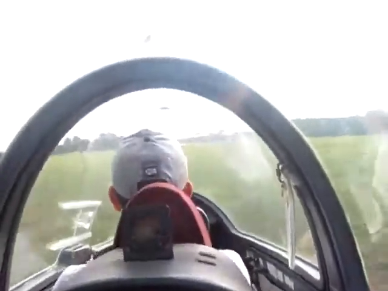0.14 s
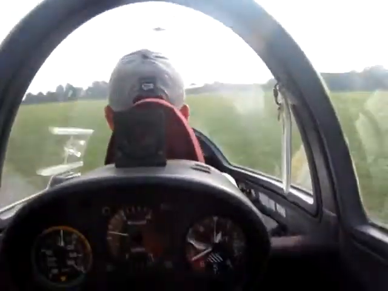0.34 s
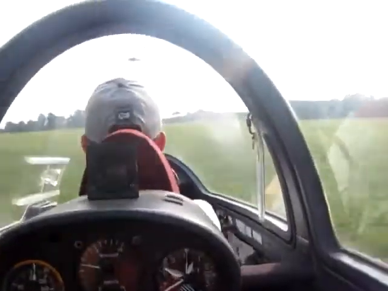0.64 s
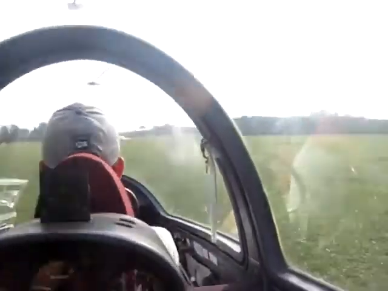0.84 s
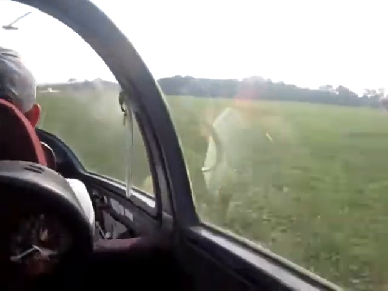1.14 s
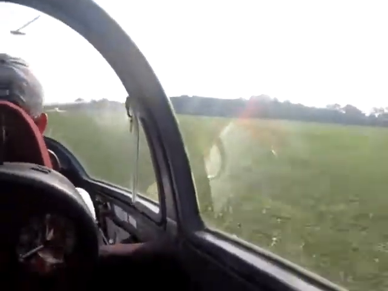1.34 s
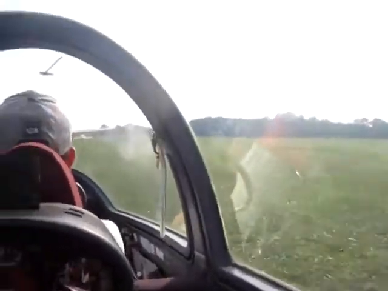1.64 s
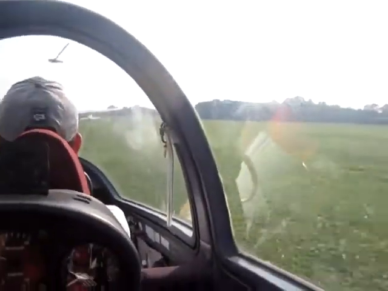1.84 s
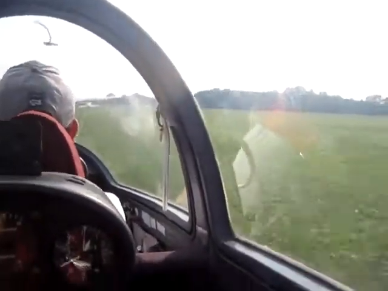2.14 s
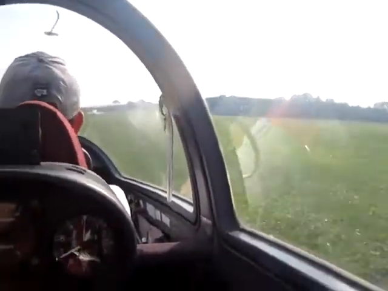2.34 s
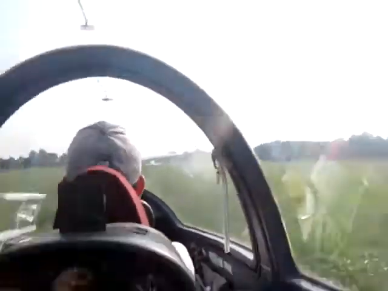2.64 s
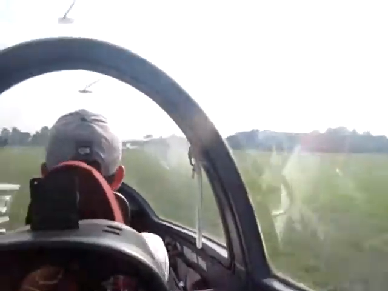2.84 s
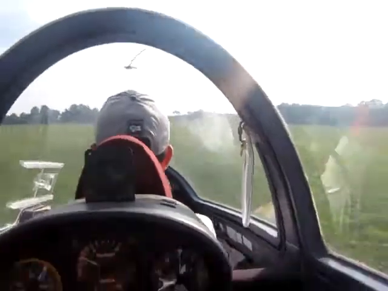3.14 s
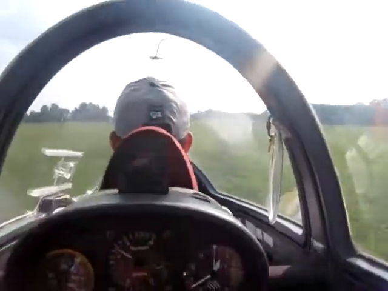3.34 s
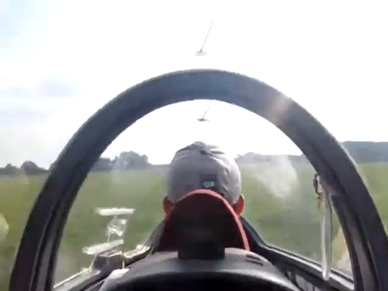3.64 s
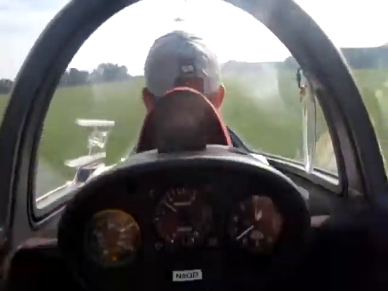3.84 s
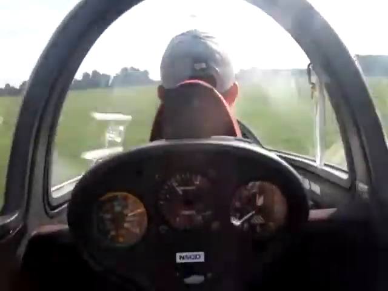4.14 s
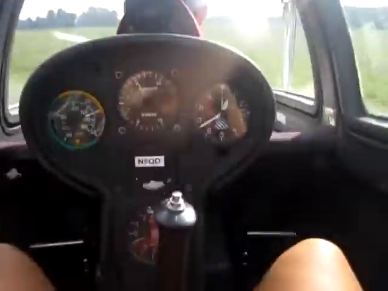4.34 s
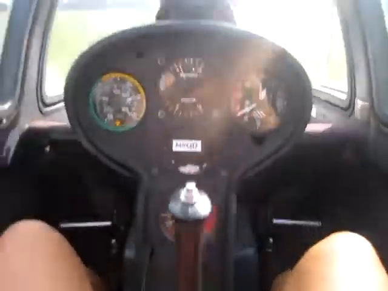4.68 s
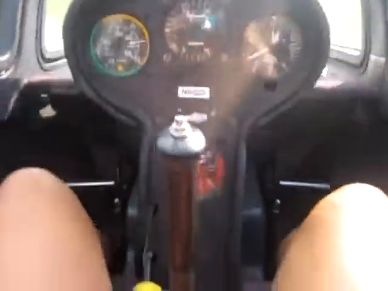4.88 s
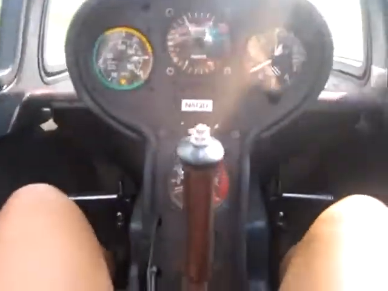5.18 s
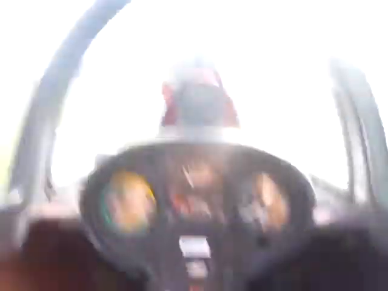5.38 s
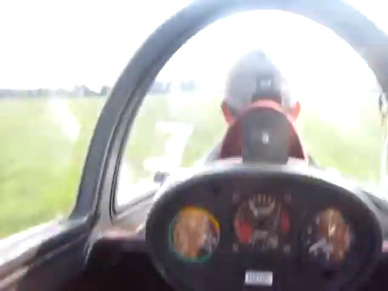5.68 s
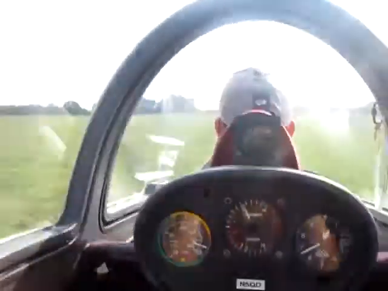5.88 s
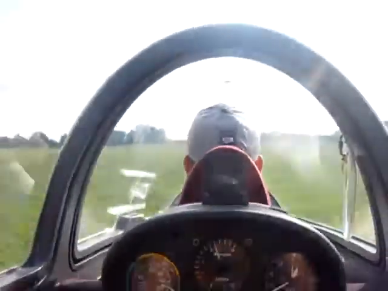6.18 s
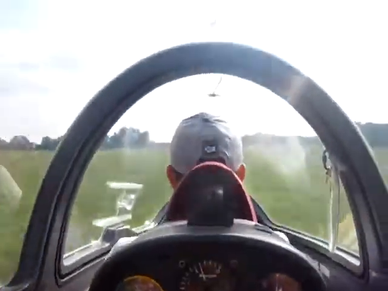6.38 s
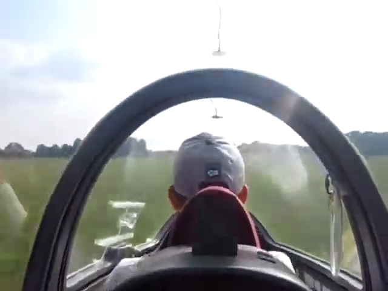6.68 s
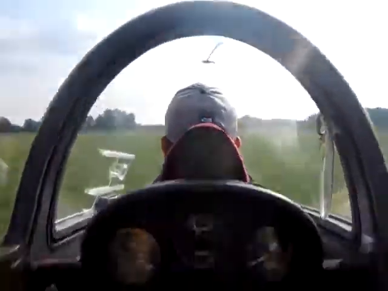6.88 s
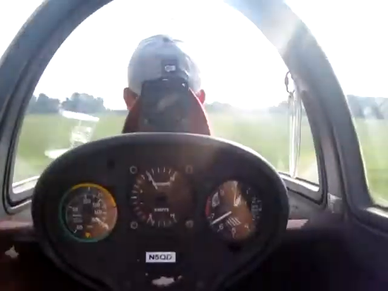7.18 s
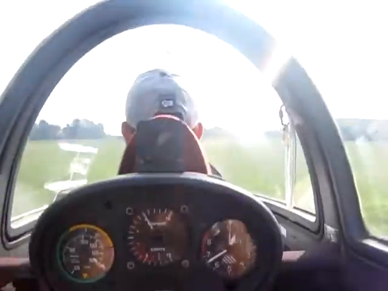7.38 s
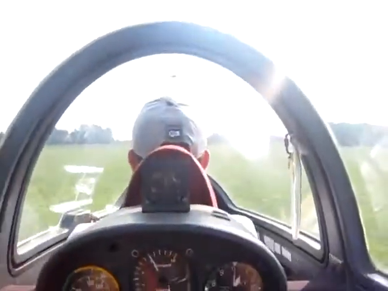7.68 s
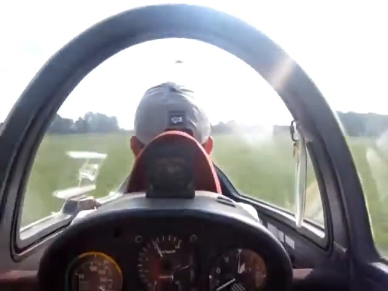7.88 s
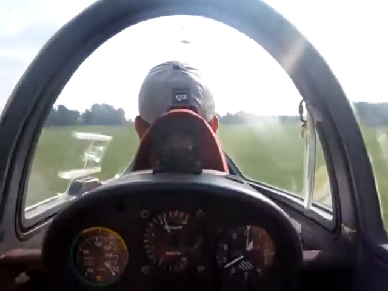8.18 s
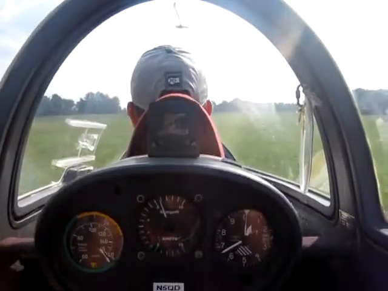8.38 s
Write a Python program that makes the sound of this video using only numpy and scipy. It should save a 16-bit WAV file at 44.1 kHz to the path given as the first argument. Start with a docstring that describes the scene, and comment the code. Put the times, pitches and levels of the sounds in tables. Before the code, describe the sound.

A glider takes off from a rough field, heard close up inside its hollow shell. Deep continuous drumming comes with fine buzzing, hard knocks and short metallic-plastic chatter. After a jarring start it calms a little, with faint squeaky rubs, then more heavy jolts follow. Around seven seconds the rattling thins out and dense, surging wind noise takes over. The small microphone gives a dry, compressed sound with no extreme highs.

```python
"""Inside the cockpit of a glider rolling fast over a bumpy grass field, heard by a small microphone.
The wheel drums the hollow fuselage and works panels and fittings: noise shaped by their resonances.
Jolts set the canopy frame chattering and clacking; blows and slow rubs ring the modes of the shell.
When the wings take the weight, the wheel eases and the airflow swells into a gusty roar of shaped noise.
A limiter holds down the peaks, and the microphone loses one band and the extreme treble."""
import sys
import numpy as np
from scipy import signal
from scipy.fft import rfft, irfft, next_fast_len
from scipy.io import wavfile
from scipy.ndimage import uniform_filter1d, minimum_filter1d, map_coordinates

SR = 44100
rng = np.random.default_rng(int(sys.argv[2]) if len(sys.argv) > 2 else 0)


def to_wav(sig):
    """Store sig (one row per channel, or 1-D mono) as 16-bit WAV at the path in sys.argv[1].

    Samples outside -1..1 are clipped; the rate is SR.
    """
    pcm = np.clip(np.atleast_2d(sig), -1, 1) * 32767
    pcm = np.round(pcm).astype(np.int16)
    wavfile.write(sys.argv[1], SR, pcm.T)  # frames by channels


N = 375732

# Jolts of the canopy frame. Each row: start in seconds, nominal chatter peak in dB, length in seconds.
JOLTS = [(0.0054, -12.5, 0.033), (0.1013, -15.5, 0.016), (0.117, -14.5, 0.03), (0.182, -19.5, 0.037),
         (0.22, -29, 0.041), (0.25, -27.5, 0.078), (0.324, -19, 0.024), (0.4, -18.5, 0.018),
         (0.434, -22, 0.021), (0.483, -20, 0.024), (0.64, -28.5, 0.093), (1.093, -22, 0.015),
         (1.198, -19.5, 0.037), (1.475, -25.5, 0.03), (1.526, -22, 0.012), (1.912, -28, 0.029),
         (2.545, -22, 0.057), (2.753, -27.5, 0.021), (2.882, -26, 0.017), (2.994, -20, 0.024),
         (3.0565, -20, 0.011), (3.564, -24.5, 0.042), (3.836, -28, 0.023), (3.857, -16, 0.018),
         (3.934, -21.5, 0.037), (4.027, -21.5, 0.029), (4.133, -17.5, 0.029), (4.14, -18.5, 0.04),
         (4.234, -19.5, 0.034), (4.337, -15, 0.021), (4.3646, -13, 0.028), (4.431, -21, 0.012),
         (4.452, -14, 0.022), (4.504, -18, 0.011), (4.595, -27.5, 0.047), (4.647, -19.5, 0.029),
         (4.725, -19.5, 0.019), (4.958, -26.5, 0.091), (5.038, -24, 0.024), (5.232, -26.5, 0.033),
         (5.256, -18, 0.03), (5.318, -22.5, 0.018), (5.3423, -12, 0.018), (5.366, -18.5, 0.012),
         (5.42, -15.5, 0.025), (5.464, -24, 0.032), (5.712, -27.5, 0.03), (5.927, -25.5, 0.044),
         (6.02, -28, 0.08), (6.111, -25, 0.091), (6.226, -12.5, 0.023), (6.322, -13, 0.013),
         (6.347, -17, 0.024), (6.621, -20, 0.02), (6.788, -26, 0.018), (7.083, -19.5, 0.022),
         (7.125, -14.5, 0.004), (7.177, -18, 0.017)]
# Resonances of the cockpit panels. Each row: pitch in Hz, width in Hz, relative strength in dB.
PANELS = [(257, 20, 0), (302.7, 24.5, 8), (351, 18, 2), (413, 21, 7), (687, 194, 4.5)]
# Resonances of the canopy frame. Each row: pitch in Hz, width in Hz, relative strength in dB.
FRAME = [(1016, 7.8, 12), (1090, 7.7, 7.5), (1321.5, 8, 14.5), (1660, 120, 3), (2070, 48, 3.5),
         (2660, 62, -6.5), (3250, 45, -1), (4880, 180, 1.5), (5450, 160, 5)]
# The wings take the weight: middle and half length of the change.
LIFT_S, LIFT_SPAN_S = 7.12, 0.09


def roll():
    """Wheel drumming, panel boom and fitting buzz: noise through resonances, shaken by bumps of the turf."""
    # Drum modes of the hollow fuselage. Each row: pitch in Hz, width in Hz, relative strength in dB.
    fuselage = [(62.6, 26, -0.5), (94, 19, 5), (129.4, 10.6, 7.5), (162.3, 33, 9), (191, 11, 7.5)]
    # Broad spectra under the modes. Each row: frequency in Hz, relative level in dB per Hz.
    ground = [(12, -41), (25, -10.5), (60, -6), (150, -3), (220, -8), (400, -17), (1000, -98)]
    boom_spectrum = [(100, -49), (230, -2.5), (450, -11), (800, -21.5), (1400, -25), (2500, -35),
                     (6000, -75)]
    buzz_spectrum = [(300, -19), (800, 11), (1500, -1), (3000, -1.5), (5000, -13), (10000, -10.5),
                     (12000, -20.5), (15500, -32)]
    # How hard the ground works the panels. Each row: time in seconds, boom level in dB at 260-900 Hz.
    roughness = [(0, -27), (.28, -23), (.5, -29), (.75, -30), (1.11, -23), (1.42, -32), (1.85, -28),
                 (2.3, -30), (2.5, -22.5), (2.7, -26.5), (3.3, -27.5), (4.1, -26.5), (4.6, -28), (5.2, -26),
                 (5.72, -26.5), (6.14, -25), (7.1, -25.5), (8.52, -28)]
    drum_steady_db, drum_start_db, drum_rise_s, drum_lift_db = -17, -7, 0.21, -4  # at 40-220 Hz
    buzz_start_db, buzz_db_per_s, buzz_lift_db = -51, 0.51, 3.5  # at 2.5-12 kHz; grows with speed
    buzz_follows = 0.85  # dB of buzz per dB of boom

    t, light = np.arange(N) / SR, lift()
    drum_db = drum_steady_db + drum_start_db * np.exp(-(t / drum_rise_s) ** 2) + drum_lift_db * light
    rough_db = np.interp(t, *np.transpose(roughness))
    buzz_db = buzz_start_db + buzz_db_per_s * t
    buzz_db += (buzz_lift_db + gust_db()) * light
    buzz_db += stir_db() * (1 - light)
    buzz_db += buzz_follows * (rough_db - rough_db.mean())

    # Boom and buzz share these bumps, which weaken as the wheel grows light.
    bumps = (1 - 0.65 * light) * wobble(13)
    ripples = (1 - 0.65 * light) * wobble(35)
    drum = filtered(rng.standard_normal(N), body(ground, fuselage))
    boom = filtered(rng.standard_normal(N), body(boom_spectrum, PANELS))
    boom *= amp(1.1 * bumps + 1.6 * ripples + 1.2 * wobble(24))
    buzz = filtered(contacts(150, 5), body(buzz_spectrum, FRAME))
    buzz *= amp(0.66 * bumps + 1.9 * ripples + 3.0 * wobble(70))
    boom, buzz = patchy(boom, patchy_db=1.5), patchy(buzz, patchy_db=2.0)

    drum, boom, buzz = unit(drum, 40, 220), unit(boom, 260, 900), unit(buzz, 2500, 12000)
    return amp(drum_db) * drum + amp(rough_db) * boom + amp(buzz_db) * buzz


def jolts():
    """Each jolt rings the stiff canopy frame and leaves a dying burst of chatter from touching parts."""
    # Broad spectrum of the chatter. Each row: frequency in Hz, relative level in dB per Hz.
    chatter_spectrum = [(300, -28), (800, -0.5), (1500, 0), (3000, 0), (5000, -5.5), (10000, -6.5),
                        (12000, -16.5), (15500, -33)]
    crest_db = 11  # peaks of dense chatter stand this far above its rms

    t = np.arange(SR // 4) / SR
    hz, width, mode_db = np.transpose(FRAME)[:, :, None]
    # Faint random ticks of loose parts before lift: start in seconds, level in dB, length in seconds.
    ticks = [0, -36, .006] + [LIFT_S, 9, .012] * rng.random(size=(70, 3))
    shocks = np.vstack([JOLTS, ticks])
    draws = rng.standard_normal((len(shocks), len(FRAME), 1))
    shake = np.zeros((2, N + SR))  # power of the dull and the bright chatter
    clacks = np.zeros(N + SR)
    for (s, db, length), draw in zip(shocks, draws):
        at = slice(round(s * SR), round(s * SR) + len(t))
        swell = 1 - np.exp(-t / (.002 * amp(-.7 * (db + 14))))  # weak jolts build up more slowly
        # After a hard front the parts keep bouncing a while, then settle.
        hold = np.exp(-(t / length) ** 1.18) * (1 + 0.42 * np.exp(-t / 0.0036))
        dull_db = -.3 * (db + 9.0) + 0.9 * draw[0]  # hard jolts are brighter
        part_db = db - crest_db + dull_db * [[1], [0]]
        shake[:, at] += (amp(part_db) * hold * swell) ** 2

        strength = amp(mode_db + 3.5 * draw)
        detuned_hz = hz * (1 + 0.021 * draw[::-1])
        ring = strength * np.exp(-np.pi * width * t) * np.sin(2 * np.pi * detuned_hz * t)
        upper_ring = (ring * (hz > 1500)).sum(axis=0)  # only the stiff upper modes clack
        clacks[at] += amp(db - 25) * swell * upper_ring

    chatter = unit(filtered(contacts(600, 4.2), body(chatter_spectrum, FRAME, 1.1)), 1700, 12000)
    chatter = patchy(chatter, patchy_db=2.0)
    dull = filtered(chatter, lambda f: 1 / (1 + (f / 2200) ** 4))
    bright = chatter - dull
    bounce = amp(1.6 * wobble(200) + 1.1 * np.array([wobble(70), wobble(70)]))
    return (np.sqrt(shake[:, :N]) * bounce * [dull, bright]).sum(axis=0) + clacks[:N]


def knocks():
    """A blow or rub rings the shell modes near its pitch; quick fronts add a dry crack of noise."""
    # Modes of the shell. Each row: pitch in Hz, relative strength in dB, seconds to die by 60 dB.
    shell = [(425, 18.5, 0.087), (505, 20, 0.045), (600, 14, 0.045), (727.4, 9.5, 0.1), (789, 14, 0.059),
             (1074, 7.5, 0.079), (1335, 0, 0.085), (1760, -1, 0.045), (2150, 8, 0.02), (2370, 9, 0.017),
             (2760, -3, 0.064), (3310, -13, 0.074)]
    # Knocks and slow squeaky rubs. Each row: start in seconds, nominal peak in dB, pitch in Hz, rise in seconds.
    knocks_and_rubs = [(.1028, -6.5, 875, 0.00058), (.18, -22, 2280, .0005), (.398, -16, 820, 0.0013),
                       (.484, -12.5, 435, 0.0048), (1.096, -20.5, 2250, 0.00029),
                       (1.200, -17, 1060, 0.00043), (2.515, -13, 503, 0.005), (2.593, -29, 1330, .002),
                       (3.0, -34, 2100, 0.00058), (3.205, -31, 1090, 0.025), (3.21, -42, 2720, 0.022),
                       (3.298, -39, 3240, .015), (3.31, -24.5, 1050, 0.006), (3.372, -39, 2720, 0.0061),
                       (3.47, -22, 700, 0.013), (3.605, -43, 1350, 0.033), (3.858, -25, 1760, 0.00091),
                       (3.942, -14, 700, 0.0007), (4.132, -11.5, 447, 0.00082), (4.236, -15, 890, 0.0004),
                       (4.340, -13.5, 450, .001), (4.891, -16.5, 630, 0.00042),
                       (5.116, -11.5, 600, 0.00056), (6.030, -13, 690, 0.00073),
                       (6.323, -8.5, 625, 0.00095), (7.123, -18, 2200, .0005)]
    # One dry snap: start in seconds, peak in dB.
    snap = (3.0665, -16)
    # Crack against the peak of the ring for a -12 dB blow, dB more per dB harder, seconds to die by 60 dB.
    crack_db, crack_grows, crack_s = -1.5, 0.36, 0.014

    t = np.arange(SR // 8) / SR
    hz, mode_db, t60 = np.transpose(shell)[:, :, None]
    # Small taps of the rough turf fall at random before lift; higher taps are fainter.
    when, size, spot = rng.random(size=(150, 3)).T
    taps = np.transpose([when * LIFT_S, -30 + 9 * size - 12 * spot, 500 * 4 ** spot, 0.0011 + 0.0035 * size])
    touches = np.vstack([knocks_and_rubs, taps])
    draws = rng.standard_normal((len(touches), len(shell), 1))
    crack_fall_db = crack_db + crack_grows * (touches[:, 1:2] + 12.0) - 60 * t / crack_s
    cracks = amp(crack_fall_db) * rng.standard_normal((len(touches), len(t)))
    dull = np.hanning(30) / np.linalg.norm(np.hanning(30))  # the shell dulls the crack

    out = np.zeros(N + SR)
    for (s, db, pitch_hz, rise), draw, crack in zip(touches, draws, cracks):
        swell = (1 - np.exp(-t / rise)) ** 2  # a slow push outlasts the crack
        # The struck spot favours some modes; a slow rub wakes fewer.
        near_db = -(16 + (rise / 0.0014) ** 2) * np.log2(hz / pitch_hz) ** 2
        detuned_hz = hz * (1 + 0.02 * draw[::-1])
        ring = amp(mode_db + near_db + 3.0 * draw - 60 * t / t60) * np.sin(2 * np.pi * detuned_hz * t)
        first_swings = 1 + 1.1 * np.exp(-t / (rise + 0.0071))  # extra force early on
        ring = ring.sum(axis=0) * swell * first_swings
        sound = ring / abs(ring).max() + np.convolve(crack * swell, dull, 'same')
        out[round(s * SR):][:len(t)] += amp(db) * sound
    out[round(snap[0] * SR):][:2] += amp(snap[1]) * np.array([1, -.5])
    return out[:N]


def airflow():
    """A dense, gusty roar over the canopy: noise that swells at lift and sounds the panel modes."""
    # Broad spectrum of the roar. Each row: frequency in Hz, relative level in dB per Hz.
    roar_spectrum = [(25, -48), (70, 6), (150, -19), (310, -5), (700, -14.5), (1500, -19.5), (3500, -27.5),
                     (6000, -34), (9500, -36), (12000, -41.5), (15500, -67)]
    roar_db, before_db = -21.5, -21  # nominal level once light on the wheel, how much fainter before

    roar = unit(filtered(rng.standard_normal(N), body(roar_spectrum, PANELS, 1.95)))
    roar = patchy(roar, patchy_db=1.8)
    low = filtered(roar, lambda f: 1 / (1 + (f / 700) ** 2))
    surging = low + amp(gust_db() + 1.3 * wobble(25)) * (roar - low)  # mostly the upper part surges
    return amp(roar_db + before_db * (1 - lift())) * surging


def lift():
    """Share of the weight on the wings, 0 to 1."""
    return .5 + .5 * np.tanh((np.arange(N) / SR - LIFT_S) / LIFT_SPAN_S)


def stir_db():
    """How far recent jolts keep the fittings moving above their rest, in dB; the power dies away."""
    stir, settle_s = 11, 0.2  # dB added to the level of a jolt, time constant of the power
    kicks = np.zeros(N)
    for s, db, _ in JOLTS:
        kicks[round(s * SR)] = amp(db + stir) ** 2
    left = signal.fftconvolve(kicks, np.exp(-np.arange(SR) / SR / settle_s))[:N]
    return 10 * np.log10(1 + abs(left))


def gust_db():
    """Surge of the airflow at each moment, in dB."""
    # Surges of the airflow. Each row: time in seconds, dB over its steady level.
    gusts = [(7.2, 4.5), (7.33, 0.5), (7.39, 5), (7.52, -1.5), (7.58, 3), (7.76, 1), (7.88, 5), (7.97, 1),
             (8.52, 0.5)]
    return np.interp(np.arange(N) / SR, *np.transpose(gusts))


def contacts(rate, spread_db):
    """White noise plus sparse clicks of uneven size, rate a second: many small parts touching."""
    clicks = (rng.random(N) < rate / SR) * amp(spread_db * rng.exponential(size=N).clip(0, 3))
    return unit(rng.standard_normal(N) * (1 + clicks))


def body(spectrum, modes, modes_db=0):
    """Response of a vibrating body: a broad spectrum on a log axis, lifted at its resonances."""
    f, db = np.transpose(spectrum)

    def response(hz):
        power = 1
        for center, width, gain_db in modes:
            power = power + amp(gain_db + modes_db) ** 2 / (1 + (2 * (hz - center) / width) ** 2)
        return amp(np.interp(np.log(hz + 1), np.log(f), db)) * np.sqrt(power)
    return response


def patchy(x, patchy_db):
    """Random gain patches over pitch and time, as if different parts wake and settle in turn."""
    z = signal.stft(x, nperseg=512)[2]
    field = uniform_filter1d(rng.standard_normal(z.shape), size=5, axis=0)
    field = uniform_filter1d(field, size=6, axis=1)
    return signal.istft(z * amp(patchy_db * field / field.std()), nperseg=512)[1][:N]


def wobble(rate):
    """A smooth random curve, rate knots a second."""
    return map_coordinates(rng.standard_normal(N // 100), [np.arange(N) * rate / SR])


def filtered(x, response):
    """x times a response of frequency, padded so that its tail does not wrap round."""
    m = next_fast_len(N + SR // 2)
    return irfft(rfft(x, m) * response(np.fft.rfftfreq(m, 1 / SR)), m)[:N]


def unit(x, lo=0, hi=SR):
    """x scaled so that its band from lo to hi Hz has rms 1."""
    power = abs(rfft(x)) ** 2
    hz = np.fft.rfftfreq(len(x), 1 / SR)
    share = power[(hz >= lo) & (hz < hi)].sum() / power.sum()
    return x / np.sqrt(np.mean(x ** 2) * share)


def amp(db):
    """Gain of a level in dB."""
    return 10 ** (np.asarray(db) / 20)


def scene():
    """Everything heard in the cockpit, as one channel."""
    return (roll() + jolts() + knocks() + airflow())[None]


def record(dry):
    """The microphone: its port cancels one band, a limiter eases peaks, the extreme treble is cut."""
    # The port: frequency in Hz, null width in Hz, skirt width in Hz.
    port = (6383, 410, 1480)
    ceiling_db, top_hz = -3.6, 15720
    null_hz, narrow, wide = port

    def null(f):
        off = null_hz ** 2 - f * f
        return (off + 1j * f * narrow) ** 2 / (off + 1j * f * wide) ** 2

    x = filtered(dry[0], null)
    needed = np.minimum(1, amp(ceiling_db) / (abs(x) + 1e-9))
    # The gain is held low for 10 ms around each peak and smoothed over 5 ms.
    x = x * uniform_filter1d(minimum_filter1d(needed, size=441), size=221)
    return filtered(x, lambda hz: hz < top_hz)[None]


dry = scene()
out = record(dry)
to_wav(out)
```